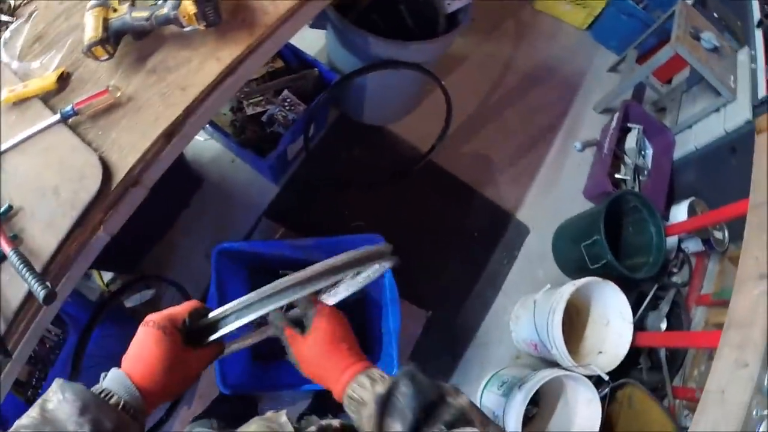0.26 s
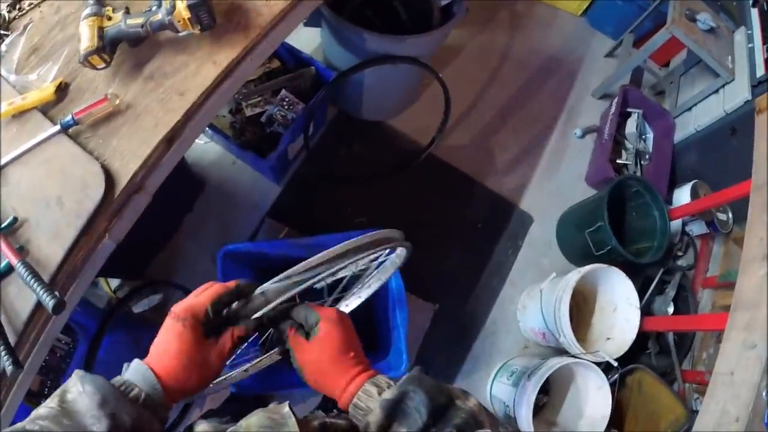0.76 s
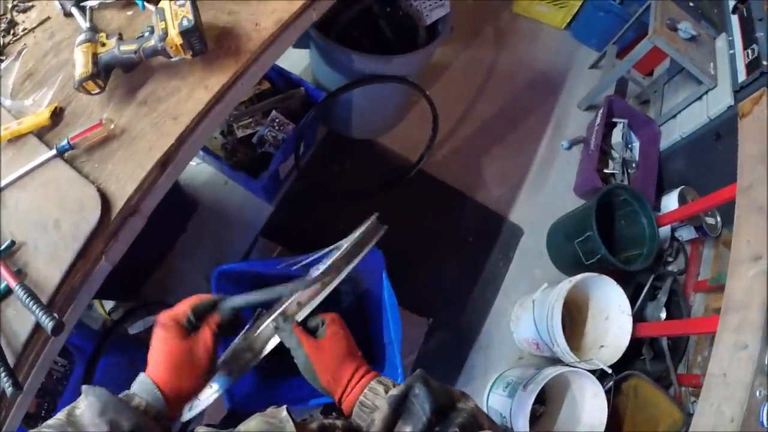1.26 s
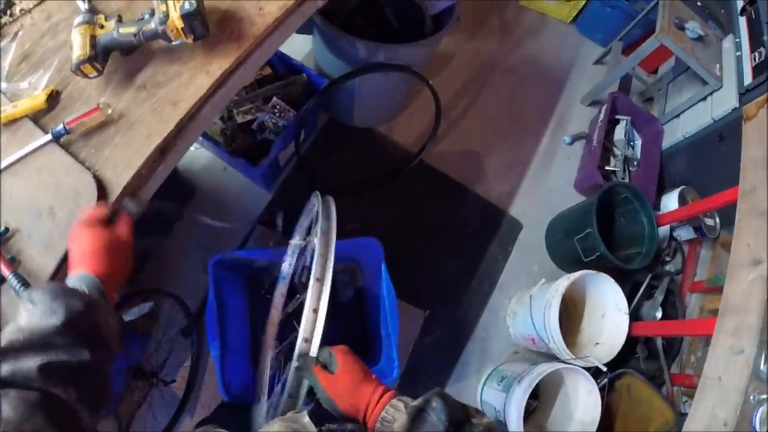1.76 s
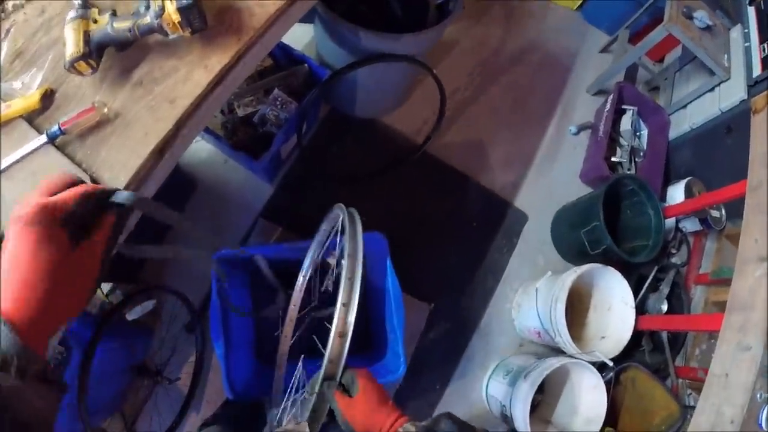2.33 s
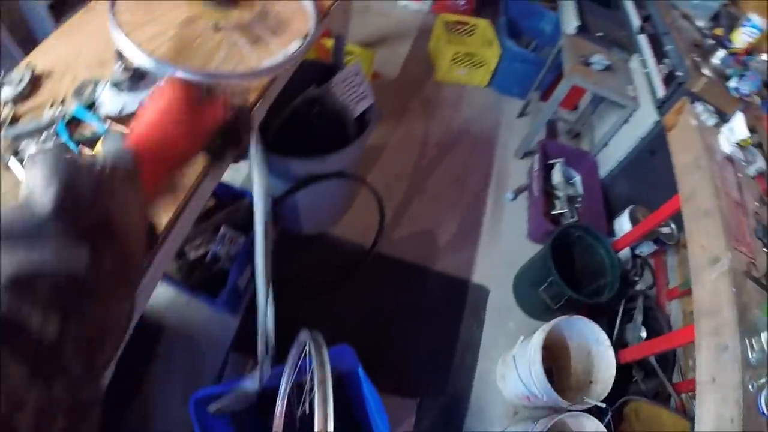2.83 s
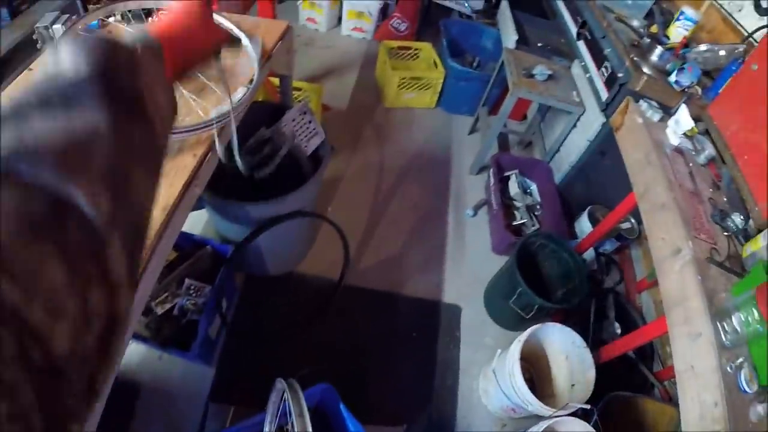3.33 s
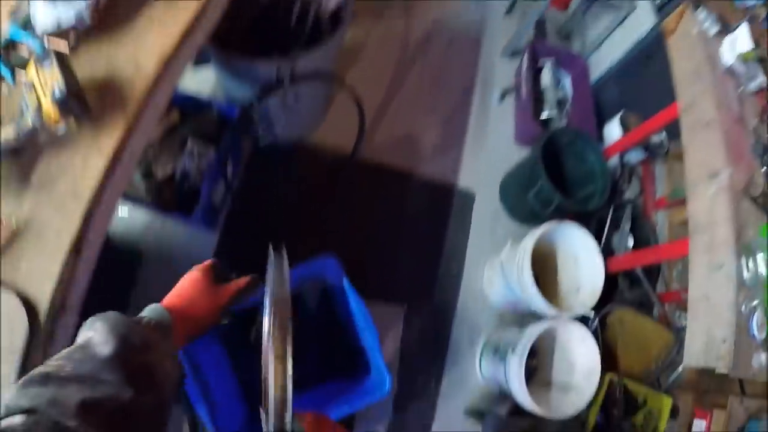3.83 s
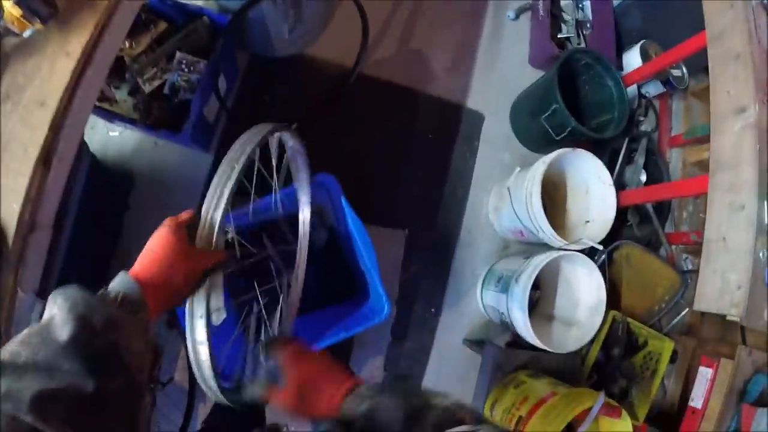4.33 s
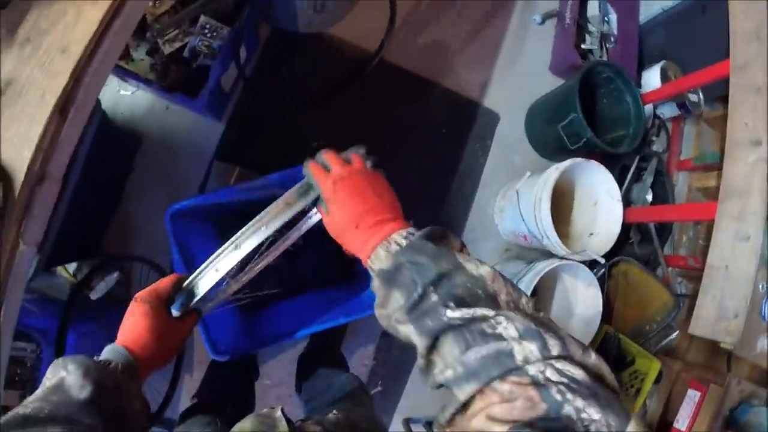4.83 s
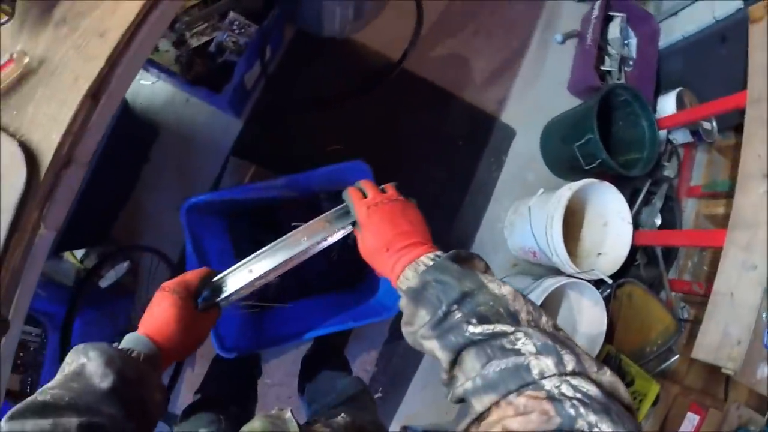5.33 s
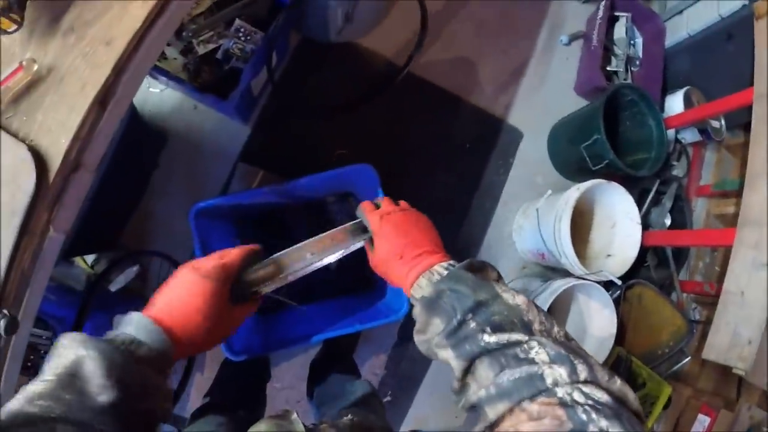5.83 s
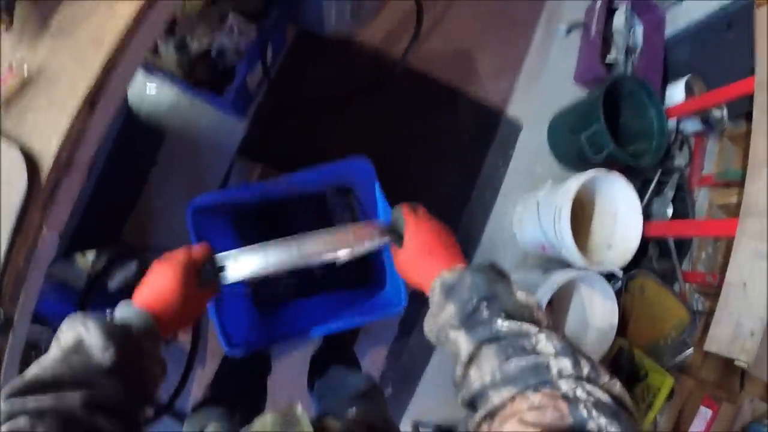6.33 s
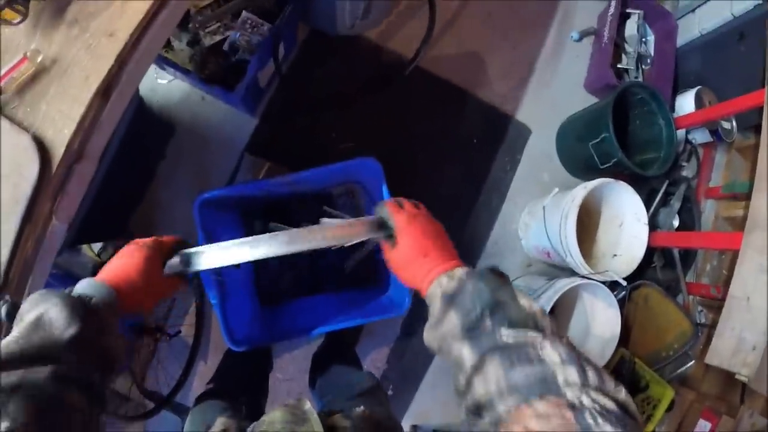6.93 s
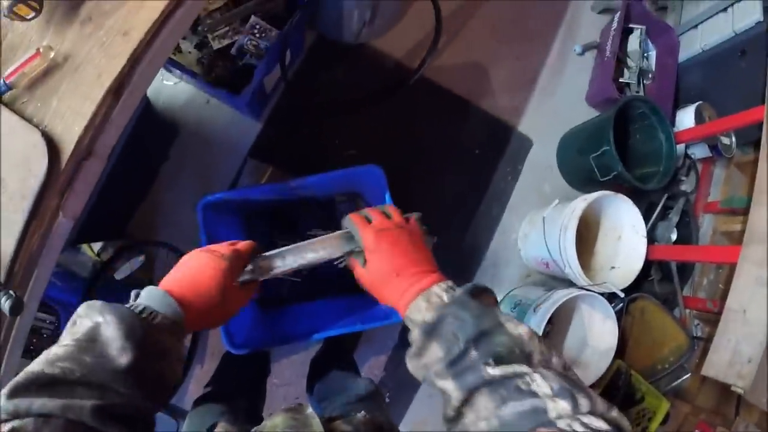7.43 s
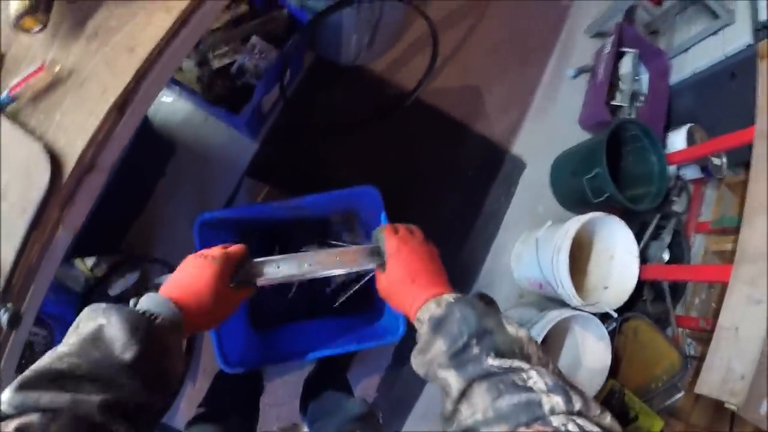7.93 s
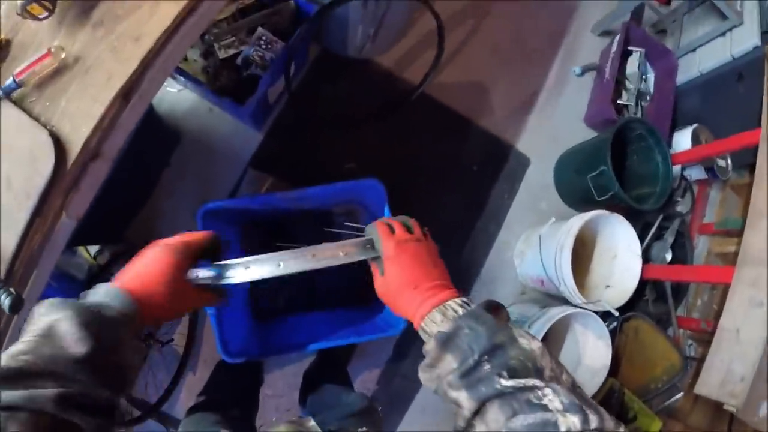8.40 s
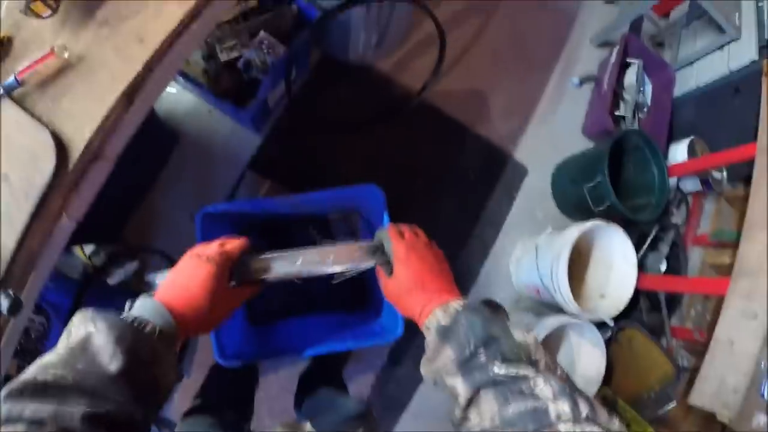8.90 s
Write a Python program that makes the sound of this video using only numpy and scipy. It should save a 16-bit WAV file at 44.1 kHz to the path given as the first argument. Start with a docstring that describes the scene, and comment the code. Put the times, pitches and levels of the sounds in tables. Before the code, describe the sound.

Bright steel spokes click and clatter against a thin metal rim in bursts, with hollow plastic thumps and short squeaky rubs in a workshop.

```python
"""Bicycle rim with cut spokes over a plastic bin

In a small workshop a rim is worked and shaken: spokes snap, clack, rattle and sing, and the bin thumps.
Strikes are bursts of shaped noise with decaying modes; rattle and grinding are random trains of impacts.
Rubbed spokes and clanks are sums of sines; cloth brushes and room tone are filtered noise.
A body-worn camera hears it with little bass and a bright resonance."""
import sys
import numpy as np
from scipy import signal
from scipy.fft import rfft, irfft, next_fast_len
from scipy.io import wavfile
from scipy.ndimage import uniform_filter1d, map_coordinates

SR = 44100
rng = np.random.default_rng(int(sys.argv[2]) if len(sys.argv) > 2 else 0)


def waveform_to_disk(signal):
    """Save audio, clipped to [-1, 1], as 16-bit WAV at the path in sys.argv[1]."""
    frames = np.transpose(np.atleast_2d(signal))
    scaled = np.clip(frames, -1, 1) * 32767
    samples = np.round(scaled).astype(np.int16)
    wavfile.write(sys.argv[1], SR, samples)


N = 403956  # length in samples
TOP_HZ = 16000  # upper band limit
HARD_RISE_S = 0.00036  # attack time constant of steel on steel
SCRAPE_SPREAD = 0.5  # log spread of the strengths of small impacts

# spectra of the three parts of a contact: hz, level_db
TICK = [(2500, -13), (4300, 0.5), (5200, 1), (7000, 0.5), (10000, -4), (15000, -1)]
CLACK = [(600, -36.5), (1400, 0), (2700, 4.5), (3800, 0), (5500, -3), (9000, -25.5)]
KNOCK = [(25, -16), (100, -21), (170, 3.5), (300, -3.5), (520, 5), (1100, -3.5), (1800, -11), (4000, -77.5)]
# the rim lands on the bin, relative levels: start_s, thump_db, reference_hz, clash_db, knock_db
BUMPS = [(1.832, -22, 204.4, -21, -42), (1.905, -14, 221.7, -31, -20.5), (4.307, -26.5, 216.7, -39, -31.5),
         (4.351, -28, 217.3, -35, -47), (4.431, -33, 219, -47, -45), (4.474, -30, 236, -36.5, -42),
         (4.948, -12.5, 225.5, -26, -19), (6.228, -13, 222.7, -18.5, -20.5), (6.298, -20, 208, -20, -40),
         (6.372, -25.5, 226.4, -35, -31), (6.995, -15.5, 230.3, -29, -26),
         (7.128, -18, 217.8, -21.5, -28.5), (7.233, -29, 198.7, -39, -35.5), (7.68, -14, 216.5, -15, -17.5),
         (7.880, -12, 228.6, -14.5, -21.5), (8.670, -9.5, 220.6, -18, -17), (8.717, -16, 230, -35, -19),
         (8.962, -12.5, 216.2, -15, -19), (9.097, -9, 223.6, -20.5, -17)]
# spells of moving or shaking the wheel, relative levels: start_s, length_s, jingle_db, chatter_db
SHAKES = [(0.395, 0.57, -50, -55), (1.245, 0.38, -44.5, -66), (1.567, 0.13, -32.5, -54),
          (1.745, 0.14, -52, -51), (1.895, 0.092, -28, -32), (2.148, 0.45, -45, -36.5),
          (3.325, 0.051, -33, -27), (3.45, .1, -53, -60), (3.834, 0.34, -49, -58), (4.33, 0.38, -53, -60),
          (4.65, 1.75, -41, -40.5), (5.133, 0.788, -39, -28), (6.65, 0.053, -34, -33),
          (7.14, 0.083, -59, -35), (7.407, 0.18, -51, -63), (7.777, 0.54, -32, -28.5),
          (8.593, 0.79, -32, -38)]


def amp(db):
    """Level: decibels to amplitude ratio."""
    return 10 ** (np.asarray(db) / 20)


def unit(x):
    """Normalisation: scale to an rms of 1."""
    return x / np.sqrt(np.mean(x ** 2) + 1e-20)


def as_blow(x):
    """Impact energy: scale to the energy of 20 ms at an rms of 1."""
    return x / np.sqrt(np.sum(x ** 2) / (SR * 0.02) + 1e-20)


def along(points, hz):
    """Logarithmic frequency scale: interpolate (hz, value) points."""
    f, v = np.transpose(points)
    return np.interp(np.log(hz + 1), np.log(f + 1), v)


def coloured(x, points):
    """Minimum-phase filtering: a causal filter with the gain of (hz, level_db) points."""
    m = 2 * next_fast_len(len(x) * 5 // 8)
    gain = amp(along(points, np.fft.rfftfreq(m, 1 / SR)))
    cepstrum = irfft(np.log(gain))
    # folding the cepstrum forward in time makes the filter causal
    cepstrum[1:m // 2] *= 2
    cepstrum[m // 2 + 1:] = 0
    return irfft(rfft(x, m) * np.exp(rfft(cepstrum)))[:len(x)]


def fade(t, t60):
    """Exponential decay: the amplitude falls by 60 dB in t60 seconds."""
    return np.exp(-np.log(1000) * t / np.maximum(t60, 1e-3))


def spell(t, length, rise, t60):
    """Envelope of sustained excitation: a linear rise, a hold until length, then free decay."""
    return np.minimum(t / rise, 1) * fade(np.maximum(t - length, 0), t60)


def add(track, s, x):
    """Superposition: mix x into the track at time s."""
    start = max(round(s * SR), 0)
    track[start:start + len(x)] += x[:max(len(track) - start, 0)]


def in_room(x, wet_db, build=0.0004):
    """Reverberation: convolve with noise that builds up and decays at a rate set by frequency."""
    # decay of the cluttered workshop: hz, t60_s
    workshop = [(150, 0.68), (400, 0.39), (1000, 0.46), (2800, 0.35), (7000, 0.15), (14000, 0.24)]
    hz, t, z = signal.stft(rng.standard_normal(SR // 2), SR, nperseg=256)
    envelope = fade(t, along(workshop, hz)[:, None]) * (1 - np.exp(-t / build))
    tail = signal.istft(z * envelope, SR, nperseg=256)[1]
    tail = tail / np.linalg.norm(tail)
    return x + amp(wet_db) * signal.fftconvolve(x, tail)[:len(x)]


def ringing(t, modes, colour, scatter_db=4):
    """Modal superposition: decaying sines, at new strengths for each spot struck."""
    hz, db, t60 = np.transpose(modes)
    strength = amp(db + along(colour, hz) + scatter_db * rng.standard_normal(len(hz)))
    phase = rng.uniform(0, 2 * np.pi, len(hz))
    heard = strength > strength.max() / 20  # weak modes are left out
    partials = zip(strength[heard], hz[heard], phase[heard], t60[heard])
    return sum(g * np.sin(2 * np.pi * f * t + p) * fade(t, d) for g, f, p, d in partials)


def spoke_modes(base_hz=130, spread=0.22, t60=0.074, count=10):
    """Bending waves in a bar: modes rise as the square of their order; each spoke has its own length."""
    scale_hz = base_hz * np.exp(spread * rng.standard_normal())
    hz = scale_hz * (np.arange(count) + 1.5) ** 2
    return [(f, 0, t60) for f in hz if f < TOP_HZ]


def burst(t, colour, t60, rise, rough, hold=0, crack=0.72, crack_t60=0.0064):
    """Impact noise: a first crack, then a buzz of tiny impacts that holds and dies away."""
    roughness = np.exp(rough * unit(uniform_filter1d(rng.standard_normal(len(t)), size=60)))
    impacts = rng.standard_normal(len(t)) * roughness
    attack = 1 - np.exp(-t / max(rise, 1e-4))
    envelope = attack * (fade(np.maximum(t - hold, 0), t60) + crack * fade(t, crack_t60))
    return as_blow(coloured(impacts * envelope, colour))


def patter(rate, spread, t60):
    """Shot noise: small random contacts, on average rate a second, each a short burst."""
    strength = np.exp(spread * np.clip(rng.standard_normal(N), -2, 2))
    hits = (rng.random(N) < rate / SR) * strength
    envelope = signal.fftconvolve(hits, fade(np.arange(SR // 10) / SR, t60))[:N]
    return envelope * rng.standard_normal(N)


def room_tone():
    """Stationary noise: a steady rush of air with a narrow low drone."""
    # spectrum of the air: hz, density_db (per Hz, relative)
    air_points = [(15, -34), (25, -27), (108, -24), (166, 1), (256, -6), (317, -5.5), (416, -11.5),
                  (1040, -19), (1440, -21), (4140, -38), (4870, -33.5), (6050, -28), (12500, -38),
                  (14800, -36), (16000, -57)]
    drone_points = [(120, -52.0), (148, -1.5), (157, 11.0), (167, -8.0), (210, -53.5)]
    drone = unit(coloured(rng.standard_normal(N), drone_points))
    air = unit(coloured(rng.standard_normal(N), air_points))
    return amp(-53.5) * air + amp(-58.0) * drone


def snaps():
    """Impulsive contact: a spoke snaps free, or a hard blow of the rim cracks sharply, broad in pitch."""
    # start_s, level_db, peak_hz
    cracks = [(0.339, -37.5, 6000), (0.8804, -40, 3700), (0.977, -49.5, 3260), (1.2141, -25, 7800),
              (2.019, -25, 3120), (2.2645, -25, 2450), (2.303, -22.5, 5800), (2.8572, -28, 860),
              (3.3345, -46, 900), (5.2405, -28.5, 1334), (5.3585, -28, 900), (6.6275, -16.5, 9630),
              (6.627, -29.5, 2700), (7.742, -28, 3050), (8.0223, -21.5, 1800), (8.2215, -25, 900),
              (8.5205, -24, 3730)]
    out, t = np.zeros(N), np.arange(SR // 3) / SR
    for s, db, hz in cracks:
        band = [(hz / 8, -30), (hz / 2, -10), (hz, 0), (hz * 2, -8), (hz * 4, -20)]
        crack = burst(t, band, t60=0.009, rise=0.0003, rough=0.28, hold=0.0027)
        add(out, s, in_room(amp(db) * crack, wet_db=-11.5))
    return out


def zings(width=0.052):
    """Narrow-band excitation: a sprung spoke slips over the edge of its hole and rings roughly."""
    # start_s, level_db, pitch_hz, t60_s
    edge_slips = [(0.340, -43, 5100, 0.018), (1.716, -57, 2100, 0.078), (2.263, -27.5, 5420, 0.019),
                  (6.226, -33, 3300, 0.13), (6.269, -23, 3310, 0.031), (6.271, -28.5, 5500, 0.056),
                  (1.942, -23.5, 6000, 0.037), (7.687, -33.5, 5650, 0.027), (8.152, -31.5, 5650, 0.1)]
    out, t = np.zeros(N), np.arange(SR // 3) / SR
    for s, db, hz, t60 in edge_slips:
        skirts = (hz * (1 - 2 * width), -16), (hz, 0), (hz * (1 + 2 * width), -16)
        band = [(hz / 2, -50), *skirts, (hz * 2, -50)]
        zing = burst(t, band, t60, rise=0.00037, rough=0.15)
        add(out, s, in_room(amp(db) * zing, wet_db=-16.0))
    return out


def picks():
    """Damping by contact: fingers pick at the gripped rim; the glove keeps these clicks from ringing."""
    # relative levels: start_s, tick_db, clack_db
    clicks = [(0.34, -39, -67), (0.444, -32, -61), (0.51, -34.5, -51), (0.557, -35.5, -56),
              (0.753, -36, -51), (0.825, -35.5, -49), (0.881, -44, -50), (1.147, -40, -50),
              (1.206, -31, -56), (3.268, -45, -53), (3.508, -33, -66), (3.582, -39, -67),
              (3.992, -30.5, -48), (4.04, -36.5, -57), (4.095, -45, -52), (4.138, -39, -64),
              (4.423, -44, -57), (4.57, -55, -60), (4.599, -38, -54), (4.735, -30, -58),
              (4.906, -33.5, -60), (7.385, -62, -50), (7.415, -43, -48), (7.561, -32.5, -48)]
    # spectrum of the bright tick: hz, level_db
    tick_points = [(1500, -14), (4000, -1), (5200, 1), (7000, 2), (10000, -2), (15000, -9)]
    out, t = np.zeros(N), np.arange(SR // 3) / SR
    for s, tick_db, clack_db in clicks:
        tick = amp(tick_db - 9.0) * burst(t, tick_points, t60=0.051, rise=0.0027, rough=0.61)
        clack = amp(clack_db - 6.5) * burst(t, CLACK, t60=0.053, rise=0.00054, rough=0.36)
        add(out, s, in_room(tick + clack, wet_db=-3.0))
    return out


def blows():
    """Contact stiffness: bare steel strikes have a fast attack, the clash of a landing on plastic a slow one.

    Rows, relative levels: start_s, tick_db, clack_db, knock_db, rise_s, t60_s."""
    # a spoke strikes the rim, relative levels: start_s, tick_db, clack_db, knock_db
    contacts = [(1.645, -19, -32, -60), (1.715, -24.5, -31.5, -34), (1.761, -24.5, -41, -43),
                (1.807, -24.5, -37, -42), (1.826, -12, -46, -30), (1.84, -18, -52, -48),
                (1.885, -21, -30.5, -40), (1.942, -11, -26.5, -16.5), (1.96, -23, -32, -38),
                (1.992, -15, -22, -18.5), (2.018, -18, -19.5, -12), (2.057, -15, -30, -23),
                (2.072, -19.5, -28, -20.5), (2.131, -17.5, -30, -20.5), (2.169, -33, -34, -29),
                (2.263, -43, -24.5, -18.5), (2.288, -24, -22.5, -25), (2.369, -31, -46, -26),
                (2.448, -46, -51, -41), (2.471, -23, -30.5, -23.5), (2.517, -22.5, -40, -27),
                (2.539, -20.5, -33.5, -26), (2.595, -34, -39, -30), (2.64, -24, -38, -30),
                (2.691, -9, -26, -16.5), (2.856, -21, -27, -18.5), (3.335, -19, -52, -23.5),
                (3.418, -27.5, -48, -29.5), (4.357, -27.5, -34, -61), (4.624, -31, -28, -29.5),
                (4.748, -15.5, -28.5, -49), (4.768, -28, -29.5, -33), (4.806, -23.5, -48, -53),
                (4.863, -24.5, -28.5, -29.5), (4.989, -14.5, -21, -27), (5.036, -8.5, -22, -15.5),
                (5.08, -18.5, -29.5, -50), (5.120, -19.5, -30, -30), (5.162, -20.5, -25.5, -24),
                (5.205, -21, -23.5, -19), (5.217, -15, -30, -18), (5.24, -11, -20.5, -12.5),
                (5.273, -31, -36, -21), (5.303, -28, -33, -22), (5.341, -25, -48, -32),
                (5.357, -11.5, -21, -10.5), (5.394, -11, -18.5, -15), (5.428, -19, -39, -34),
                (5.472, -21.5, -23.5, -39), (5.558, -22, -38, -21.5), (5.578, -19, -25, -29),
                (5.588, -16.5, -29, -24), (5.631, -14.5, -14.5, -13), (5.738, -11.5, -23, -20),
                (5.769, -22, -29, -19.5), (5.785, -28, -45, -45), (5.802, -16.5, -22.5, -46),
                (5.843, -19.5, -23.5, -16), (5.911, -26, -39, -39), (5.955, -38, -37, -42),
                (6.083, -38, -54, -48), (6.229, -33, -23, -21.5), (6.271, -16, -27.5, -56),
                (6.322, -26, -33.5, -50), (6.46, -34.5, -47, -55), (6.627, -11, -18.5, -20),
                (6.795, -41, -45, -56), (6.82, -39, -46, -58), (6.999, -37, -32.5, -23.5),
                (7.03, -24, -43, -49), (7.049, -36, -42, -48), (7.078, -28, -44, -54),
                (7.103, -38, -41, -54), (7.662, -37, -52, -60), (7.739, -22, -27.5, -35),
                (7.777, -18, -35, -34), (7.837, -13.5, -42, -58), (7.912, -19, -27, -20),
                (7.944, -20, -28.5, -30), (8.021, -13, -19, -12), (8.082, -9, -21.5, -10.5),
                (8.220, -13, -23, -10.5), (8.446, -17.5, -33, -23), (8.519, -14.5, -13.5, -16),
                (8.57, -10.5, -22, -16), (8.605, -13, -20.5, -17.5), (8.651, -20, -35, -21.5),
                (8.669, -23, -29, -22), (8.72, -27, -29, -26), (8.750, -34, -31, -19.5),
                (8.872, -21, -29, -48), (8.980, -21, -35, -41), (9.006, -17, -24, -20.5),
                (9.055, -23, -36, -31), (9.122, -12.5, -22, -23)]
    hard = [(*row, HARD_RISE_S, 0.062) for row in contacts]
    # the plastic slows the attack and damps the buzz; the clash's clack is a little weaker than its tick
    soft = [(s, clash_db, clash_db - 8.5, knock_db, 0.021, 0.038)
            for s, thump_db, hz, clash_db, knock_db in BUMPS]
    return hard + soft


def agitation():
    """Power summation: gains of jingle and chatter from spells of motion and the dying stir of each blow."""
    jingle, chatter, t = np.zeros(N), np.zeros(N), np.arange(3 * SR) / SR
    for s, length, jingle_db, chatter_db in SHAKES:
        # loose spokes pick up the motion and come to rest
        motion = spell(t, length, rise=0.048, t60=0.49)
        add(jingle, s, (amp(jingle_db) * motion) ** 2)
        add(chatter, s, (amp(chatter_db) * motion) ** 2)
    stir = fade(t[:SR], 0.84)
    for s, tick_db, clack_db, knock_db, rise, t60 in blows():
        add(jingle, s, (amp(tick_db - 21) * stir) ** 2)
        add(chatter, s, (amp(knock_db - 9) * stir) ** 2)
    return np.sqrt(jingle), np.sqrt(chatter)


def tinkle(colour, count=750, spread_db=4):
    """Random modal impacts: light taps of single spokes at random moments."""
    out, t = np.zeros(N), np.arange(SR // 16) / SR
    moments = rng.uniform(0, N / SR, count)
    levels_db = spread_db * np.clip(rng.standard_normal(count), -2, 2)
    for s, db in zip(moments, levels_db):
        tap = ringing(t, spoke_modes(), colour) * (1 - np.exp(-t / 0.00059))
        add(out, s, amp(db) * as_blow(tap))
    return unit(out)


def scrape(colour):
    """Sliding friction: a dense patter of small contacts, heard as a smooth metallic hiss."""
    return unit(coloured(patter(rate=260, spread=SCRAPE_SPREAD, t60=0.052), colour))


def rattle():
    """Excitation by motion: spokes slide in their holes; the tinkling grows with the hardness of shaking."""
    loose_db = -34  # chatter level at which the spokes jump fully in their holes
    jingle_gain, chatter_gain = agitation()
    loose, t = np.zeros(N), np.arange(2 * SR) / SR
    for s, length, jingle_db, chatter_db in SHAKES:
        looseness = min(amp(chatter_db - loose_db), 1) ** 2
        # tinkling stops soon after the shaking
        add(loose, s, looseness * spell(t, length, rise=0.048, t60=0.12))
    jingle = amp(-7.0) * jingle_gain * (scrape(TICK) + amp(-3.0) * loose * tinkle(TICK))
    clatter = amp(-8.5) * (scrape(CLACK) + amp(-3.0) * loose * tinkle(CLACK))
    chatter = amp(-10.0) * chatter_gain * (scrape(KNOCK) + clatter)
    return in_room(jingle + chatter, wet_db=-7.0)


def contact(t, colour, spoke, t60, rise, rim_db, spoke_db, rough):
    """Impact and resonance: steel buzzes on steel and leaves rim and spoke ringing."""
    # modes of the metal rim before the grip bends them: hz, level_db, t60_s
    metal = [(492, -12, 0.2), (603.7, 13, 0.15), (890, 8, 0.16), (980, 6, 0.17), (1184, 0, 0.17),
             (1438, 9, 0.069), (1545, 10, 0.067), (1990, -0.5, 0.23), (2470, 1, 0.11), (2280, 3, 0.046),
             (2780, -14, 0.09), (3125, 13, 0.025), (3580, 1, 0.15), (5770, -33, 0.047), (5700, -15, 0.047),
             (6640, 13.5, 0.26), (7900, -16, 0.11), (8400, -1, 0.1), (9000, -5, 0.071)]
    bend = 1 + 0.02 * rng.standard_normal()  # the grip shifts all rim modes together
    rim = [(hz * bend, db, decay) for hz, db, decay in metal]
    rim_ring = amp(rim_db) * as_blow(ringing(t, rim, colour))
    spoke_ring = amp(spoke_db) * as_blow(ringing(t, spoke, colour))
    buzz = burst(t, colour, t60, rise, rough, hold=0.0046)
    return as_blow(buzz + (rim_ring + spoke_ring) * (1 - np.exp(-t / rise)))


def spokes():
    """Coupled radiators: the spoke gives a bright tick, the rim wall a clack, the whole hoop a knock."""
    # spectrum of the jolted hoop: hz, level_db
    hoop = [(25, -20), (100, -28.5), (200, -0.5), (380, 8.5), (600, -5), (1200, -6.5), (2500, -14),
            (6000, -73)]
    heavy_db = -17  # below this knock level the jolt weakens twice as fast as the knock
    out, t = np.zeros(N), np.arange(SR // 6) / SR
    for s, tick_db, clack_db, knock_db, rise, t60 in blows():
        spoke = spoke_modes()
        tick = contact(t, TICK, spoke, t60 * 1.14, rise, rim_db=-16.5, spoke_db=-5.5, rough=0.51)
        clack = contact(t, CLACK, spoke, t60, rise, rim_db=-3.5, spoke_db=-16, rough=0.4)
        knock = contact(t, KNOCK, spoke, t60 * 1.55, rise, rim_db=-11, spoke_db=-23.0, rough=0.45)
        strike = amp(tick_db - 9.5) * tick + amp(clack_db - 5.5) * clack + amp(knock_db - 5.0) * knock
        # a short, deep push
        jolt_db = knock_db - 8.5 + min(knock_db - heavy_db, 0)
        jolt = amp(jolt_db) * burst(t, hoop, 0.008, rise, rough=0.15)
        add(out, s, in_room(np.pad(strike + jolt, (0, SR // 3)), wet_db=-7.0))
    return out


def clanks():
    """Split modes: an imperfectly round hoop has paired resonances, heard as a short, beating clank."""
    # resonances favoured by the spot struck and the grip: start_s, level_db, pitch_hz
    favoured = [(1.715, -42, 1320), (1.828, -30.5, 3120), (1.943, -28, 462), (1.994, -20, 493),
                (2.019, -29, 644), (2.02, -38, 2650), (2.057, -36, 2347), (2.073, -33, 1335),
                (2.292, -30, 1050), (2.691, -25, 463), (2.692, -24, 650), (2.857, -27.5, 420),
                (4.626, -37.5, 1230), (4.99, -32, 580), (5.037, -15.5, 464), (5.038, -28, 1565),
                (5.240, -18, 449), (5.242, -32, 1190), (5.359, -14.5, 332), (5.359, -29, 616),
                (5.395, -23, 680), (5.396, -29, 1014), (5.473, -37, 567), (5.631, -25, 720),
                (5.632, -42, 2650), (5.737, -26.5, 605), (5.77, -36, 1400), (5.844, -40, 2296),
                (6.628, -29.5, 602), (7.681, -35, 1528), (8.022, -16, 495), (8.023, -40, 2760),
                (8.083, -17, 292), (8.222, -34, 1060), (8.520, -22, 573), (8.52, -22.5, 1236),
                (8.521, -24, 2030), (8.571, -24.5, 540), (8.572, -35, 2745), (8.671, -31, 1415),
                (8.751, -39, 2260)]
    split = 0.078  # upper note of the pair, as a fraction above the lower
    out, t = np.zeros(N), np.arange(SR // 6) / SR
    # the gloves damp the rim
    envelope = fade(t, 0.061) * (1 - np.exp(-t / 0.0022))
    for s, db, hz in favoured:
        lower = np.sin(2 * np.pi * hz * t)
        upper = np.sin(2 * np.pi * hz * (1 + split) * t)
        add(out, s, amp(db) * as_blow((lower + amp(-9) * upper) * envelope))
    return in_room(out, wet_db=-9.5)


def bumps():
    """Hollow-body resonance: the rim lands on the bin or knocks it while pressed on it."""
    # hard knocks that ring the bin under the rim: start_s, thump_db, reference_hz
    pressed = [(2.018, -30, 254), (5.036, -32, 253), (5.237, -21.5, 238), (5.359, -31, 255),
               (5.737, -25, 239), (8.022, -22, 257), (8.081, -24, 238.6), (8.220, -18, 196.6)]
    # modes of rim and bin together: multiple of reference_hz, level_db, t60_s
    hollow = [(.74, -12.5, 0.4), (.87, -33, 0.3), (1, 4.5, 0.18), (1.09, -8, 0.26), (1.6, -4, 0.084),
              (1.75, -12.5, 0.17), (2.26, -3, 0.079), (2.599, -16, 0.11), (3.05, -21, 0.2)]
    # spectrum of the bin's dull wall: hz, level_db
    wall = [(25, -2), (100, -18.5), (160, -3), (260, -1.5), (350, -0.5), (550, 0), (900, -18.5),
            (2000, -28.5)]
    yield_s = 0.005995  # the plastic gives way before the thump
    out, t = np.zeros(N), np.arange(SR // 2) / SR
    landings = [(s + yield_s, db, hz) for s, db, hz, clash_db, knock_db in BUMPS]
    for s, db, hz in landings + pressed:
        modes = [(hz * multiple, level, t60) for multiple, level, t60 in hollow]
        ring = as_blow(ringing(t, modes, wall, scatter_db=2.5) * (1 - np.exp(-t / 0.0057)))
        thud = amp(-12.5) * burst(t, wall, t60=0.43, rise=0.002, rough=0.1)
        add(out, s, amp(db) * as_blow(in_room(ring + thud, wet_db=-9.0)))
    return out


def brushes():
    """Friction noise: gloves and sleeves brush the wheel in soft swells with a crinkly rustle on top."""
    # start_s is the swell's centre: start_s, level_db, half_length_s, rustle_db
    strokes = [(1.922, -30, 0.035, -53), (3.966, -36.5, 0.058, -61), (4.078, -67, 0.057, -62.5),
               (4.32, -45, 0.022, -48.5), (4.524, -53, 0.14, -60.5)]
    # spectra of cloth and rustle: hz, level_db
    cloth_points = [(60, -28), (180, 12), (350, 7), (700, 0), (1200, -10.5), (3000, -39), (10000, -27)]
    rustle_points = [(400, -11), (1000, 4), (2600, -2), (4500, -4), (10000, -16)]
    now = np.arange(N) / SR
    swell, crinkle = np.zeros(N), np.zeros(N)
    for s, db, half, rustle_db in strokes:
        bell = np.exp(-((now - s) / half) ** 2)
        swell += amp(db) * bell
        crinkle += amp(rustle_db) * bell
    rustle = unit(coloured(patter(rate=160, spread=SCRAPE_SPREAD, t60=0.015), rustle_points))
    cloth = unit(coloured(rng.standard_normal(N), cloth_points))
    return in_room(swell * cloth + crinkle * rustle, wet_db=-2.5)


def grinds():
    """Stick-slip: the rim grinds along the bin's edge; uneven slips judder its wall and crunch on metal."""
    # start_s, length_s, judder_db, crunch_db
    strokes = [(1.938, 0.17, -25.5, -33.5), (2.297, 0.14, -38.5, -43), (2.712, 0.045, -48, -37.5),
               (5.24, 0.033, -23, -25), (5.355, 0.18, -37, -36), (7.881, 0.11, -26, -47),
               (8.092, 0.13, -44, -40), (8.692, 0.066, -17.5, -28.5), (8.797, 0.034, -28, -36),
               (8.974, 0.024, -40, -47)]
    # spectra of judder and crunch: hz, level_db
    judder_points = [(60, -30), (120, -12), (170, 2), (250, -0.5), (330, -7.5), (560, -2), (800, -10.5),
                     (1300, -20), (3000, -46.5)]
    crunch_points = [(300, -20), (600, 6), (1400, 5.5), (3000, -5), (5500, -6), (9000, -18), (15000, -27)]
    judder, crunch, t = np.zeros(N), np.zeros(N), np.arange(SR) / SR
    for s, length, judder_db, crunch_db in strokes:
        # the rim bites and lets go
        stroke = spell(t, length, rise=0.014, t60=0.22)
        add(judder, s, amp(judder_db) * stroke)
        add(crunch, s, amp(crunch_db) * stroke)
    slips = patter(rate=320, spread=SCRAPE_SPREAD, t60=0.024)
    wall = judder * unit(coloured(slips, judder_points))
    metal = crunch * unit(coloured(slips, crunch_points))
    return in_room(wall + metal, wet_db=-7.0)


def ping():
    """Single-mode decay: one small steel part gives a thin, high note."""
    # start_s, level_db, pitch_hz, t60_s
    s, db, hz, t60 = (2, -28, 9092, 0.02)
    out, t = np.zeros(N), np.arange(SR // 4) / SR
    note = np.sin(2 * np.pi * hz * t) * fade(t, t60) * (1 - np.exp(-t / HARD_RISE_S))
    add(out, s, amp(db) * note)
    return out


def jolts():
    """Structure-borne sound: the hardest jolts reach the camera through the arms as short, deep thuds."""
    # relative levels: start_s, level_db
    shocks = [(2.013, -45), (5.365, -41), (5.736, -47), (5.843, -60), (6.627, -52), (9.098, -53)]
    # spectrum of the thud: hz, level_db
    body = [(20, -4), (60, -3), (110, 0), (220, -19), (600, -48)]
    out, t = np.zeros(N), np.arange(SR // 4) / SR
    for s, db in shocks:
        add(out, s, amp(db - 3.0) * burst(t, body, t60=0.06, rise=0.0037, rough=0.1))
    return out


def waver(t):
    """Random modulation: a smooth curve through 60 random values a second."""
    return map_coordinates(np.clip(rng.standard_normal(40), -2, 2), [t * 60], mode="mirror")


def singing(t, pitch_hz):
    """Friction-driven modes: each partial wavers in strength and drifts in pitch as the spoke slides."""
    # bending modes of the spokes left in the rim, before detuning: hz, level_db
    bending = [(1915, -4), (2470, -2.5), (2605, -10), (3120, 1.5), (3290, 5), (3350, 6), (3650, -6),
               (3998, -3), (4138, 1), (4378, 0), (4870, -12), (5180, -10), (5545, -4.5), (5680, -2),
               (6492, -10), (6950, -2), (7125, 2), (8030, -2), (8490, -3), (8832, -8)]
    detune, drift = 0.007, 0.0042  # relative pitch spread between strokes and within one
    hz, db = np.transpose(bending)
    hz = hz * (1 + detune * rng.standard_normal(len(hz)))
    # 3 dB lost per octave from the favoured pitch
    gain = amp(db - 3 * np.abs(np.log2(hz / pitch_hz)))
    out = np.zeros(len(t))
    for g, f in zip(gain, hz):
        strength = amp(4 * waver(t))
        cycles = rng.random() + np.cumsum(f * (1 + drift * waver(t))) / SR
        out += g * strength * np.sin(2 * np.pi * cycles)
    return unit(out)


def rubs():
    """Self-sustained friction: cut spokes rub in their holes and sing in many thin partials at once."""
    # start_s, length_s, level_db, favoured_hz, swell_s
    strokes = [(4.492, 0.2, -54, 5900, 0.003), (6.195, 0.027, -36, 3470, 0.03),
               (6.427, 0.037, -54, 5600, 0.003), (7.775, 0.035, -37.5, 6100, 0.003),
               (7.828, 0.028, -29, 5170, 0.01), (7.876, 0.035, -31, 4900, 0.0032),
               (7.942, 0.021, -32, 5700, 0.004), (8.934, 0.013, -26.5, 4100, 0.0032),
               (8.963, 0.037, -27, 5000, 0.0043), (9.119, 0.037, -25.5, 4700, 0.006),
               (9.15, 0.02, -30, 5200, 0.004)]
    out, t = np.zeros(N), np.arange(SR // 3) / SR
    for s, length, db, hz, swell in strokes:
        add(out, s, amp(db) * spell(t, length, swell, t60=0.055) * singing(t, hz))
    return in_room(out, wet_db=-12)


def scene():
    """Transmission paths: the wheel through the camera's small sound port, plus jolts and room tone."""
    # response of the sound port: hz, level_db
    microphone = [(30, -21), (105, -16), (130, -18.5), (160, -5), (2800, -3.5), (3900, -9.5), (4500, -12.5),
                  (5350, 2.5), (5700, 2), (6200, -5), (8500, -6.5), (10000, -5.5), (11300, -24.5),
                  (14800, -26.5), (16000, -62)]
    strikes = spokes() + clanks() + ping() + snaps() + zings() + picks() + bumps()
    wheel = strikes + grinds() + rubs() + rattle() + brushes()
    return (coloured(wheel, microphone) + jolts() + room_tone())[None]


def record(dry):
    """Band limitation: the camera keeps nothing above TOP_HZ."""
    m = next_fast_len(N + SR // 2)
    kept = np.fft.rfftfreq(m, 1 / SR) < TOP_HZ
    return irfft(rfft(dry, m) * kept, m)[:, :N]


dry = scene()
out = record(dry)
waveform_to_disk(out)
```